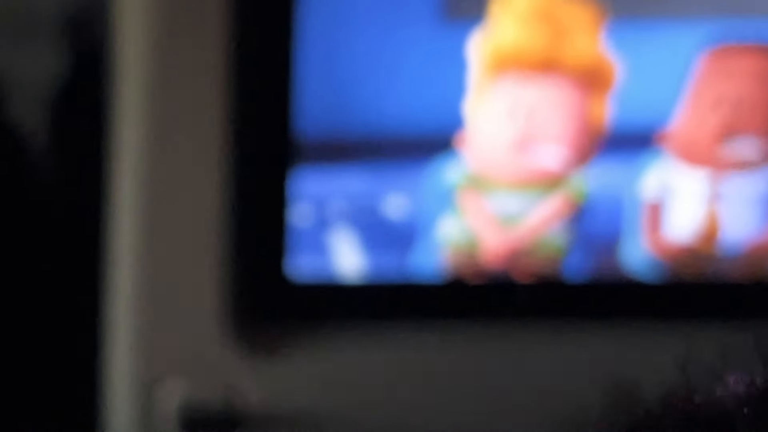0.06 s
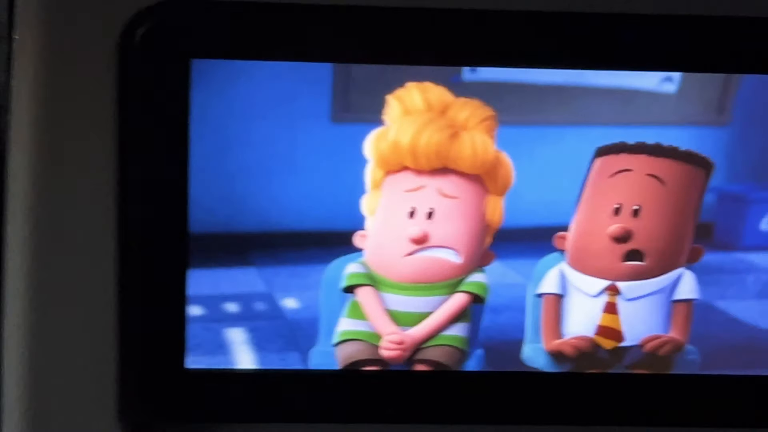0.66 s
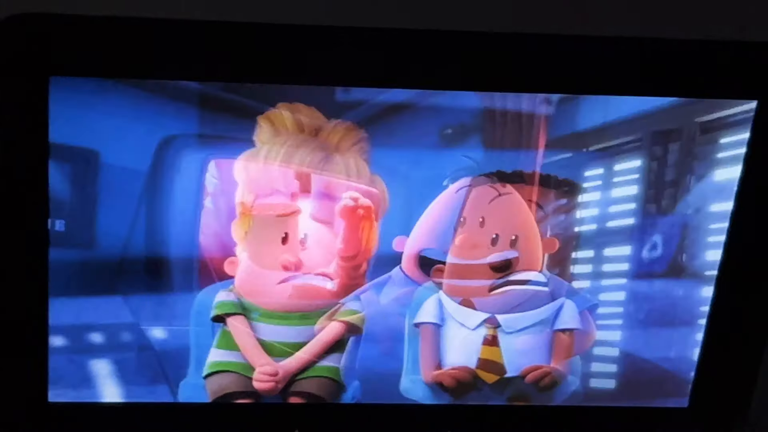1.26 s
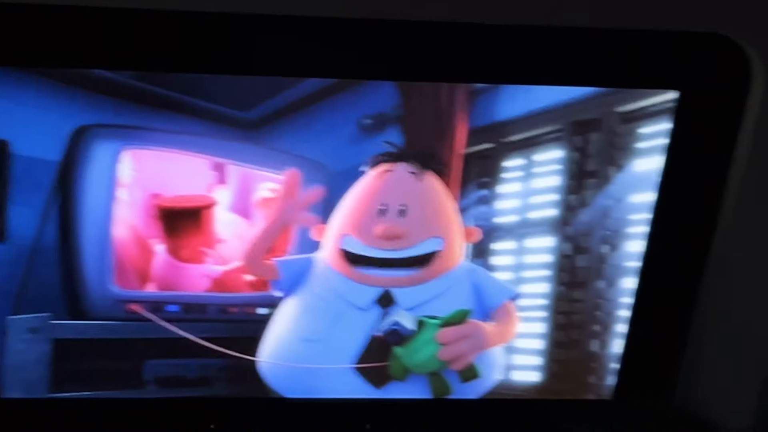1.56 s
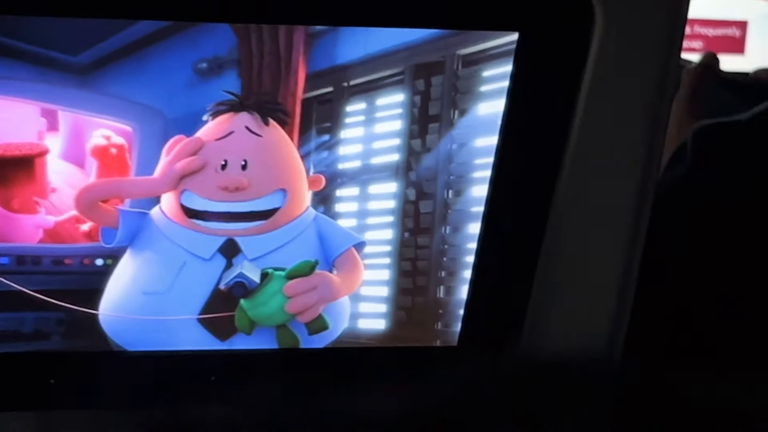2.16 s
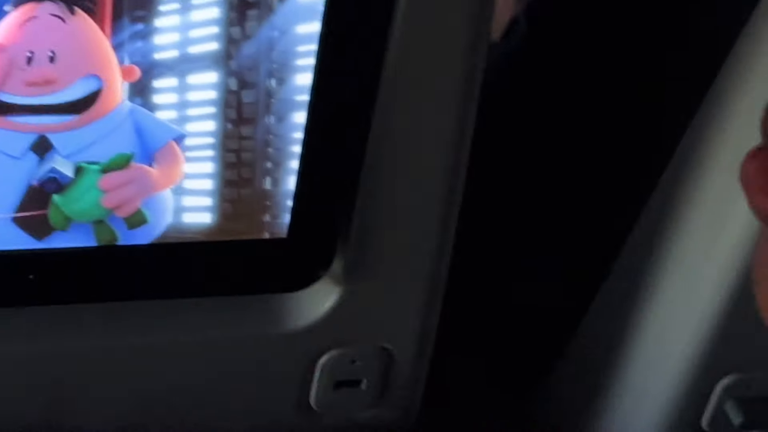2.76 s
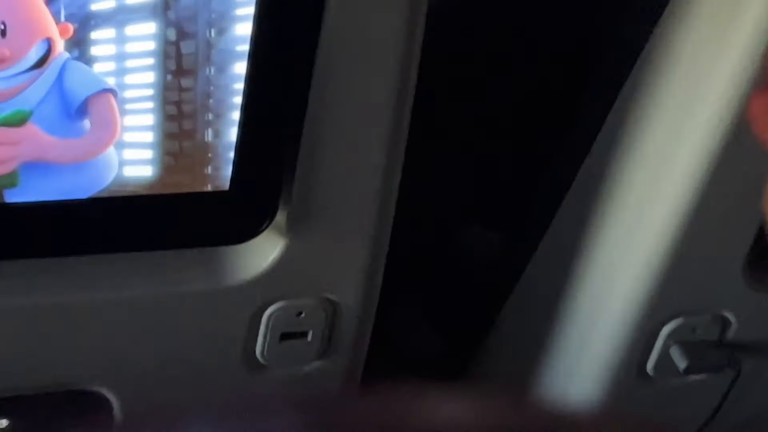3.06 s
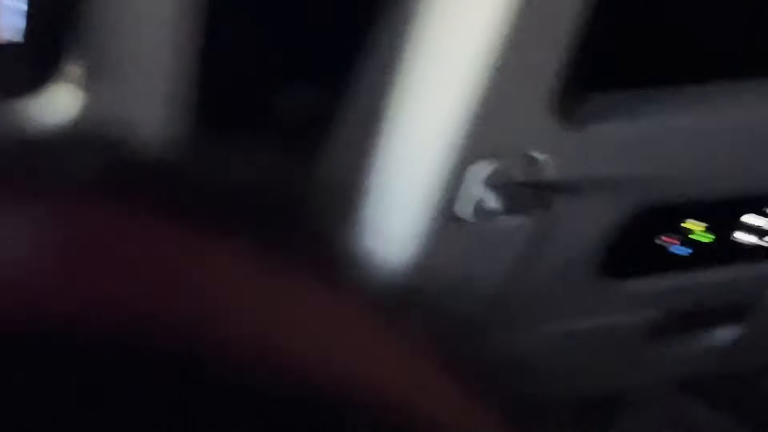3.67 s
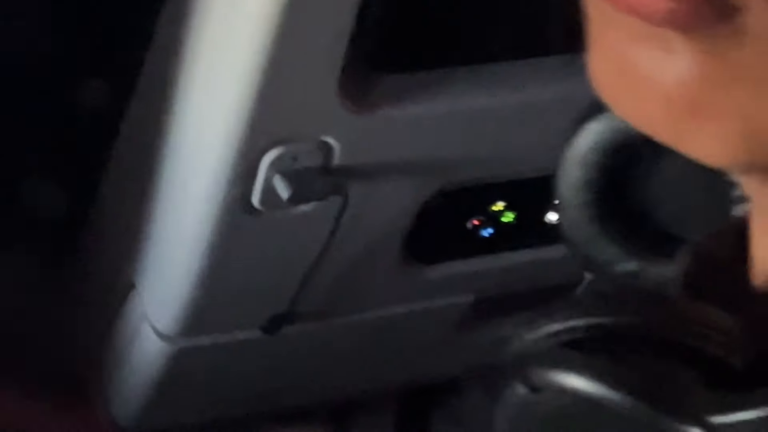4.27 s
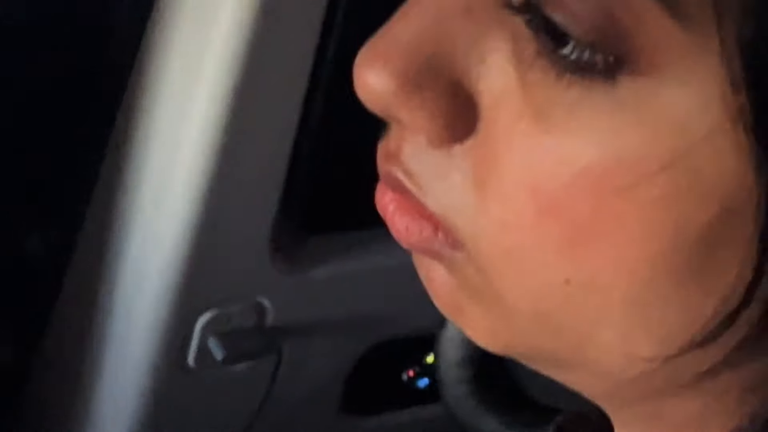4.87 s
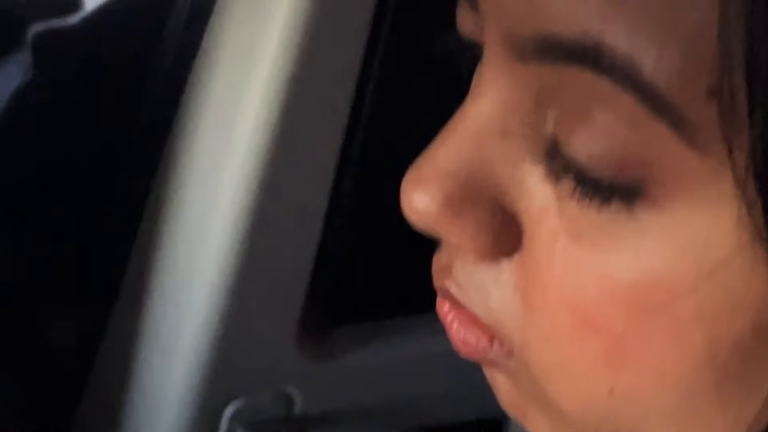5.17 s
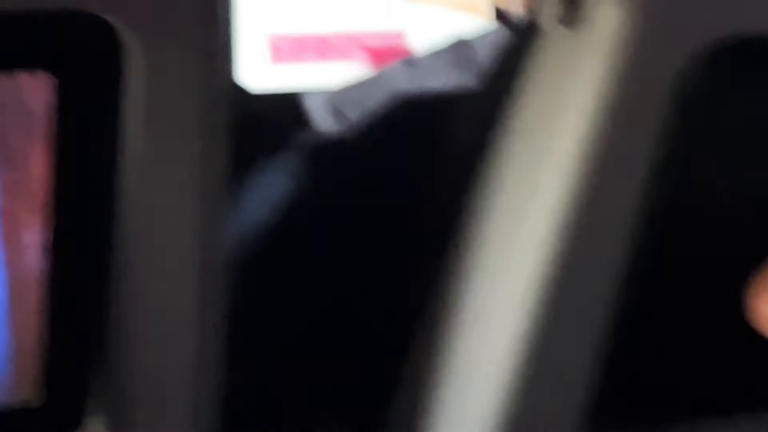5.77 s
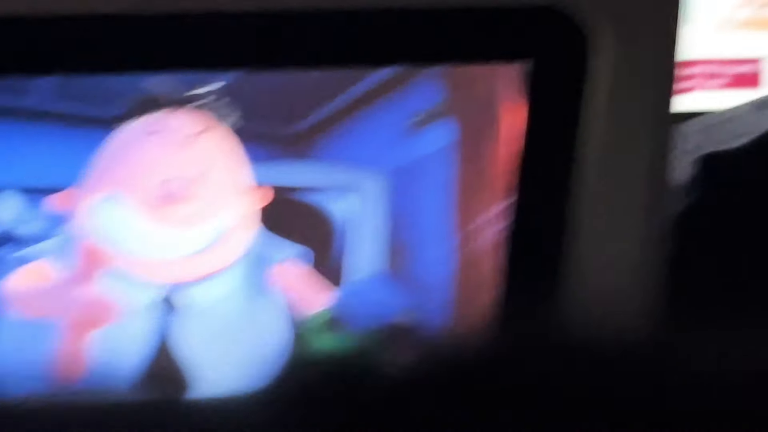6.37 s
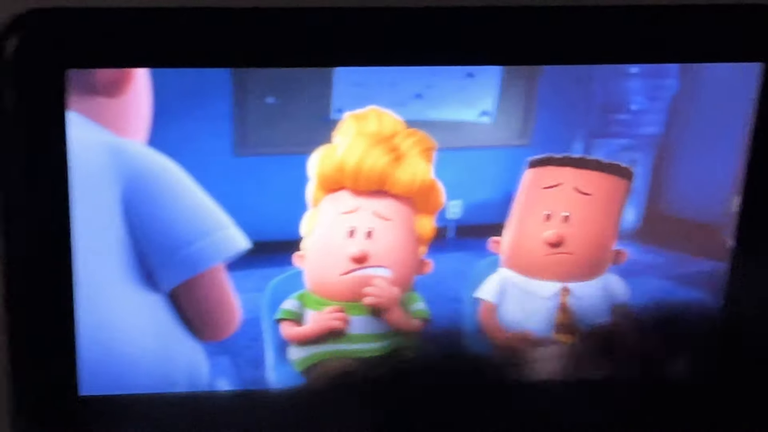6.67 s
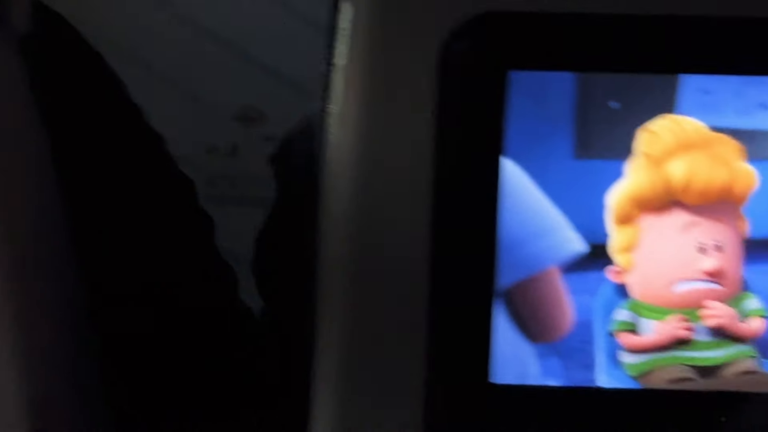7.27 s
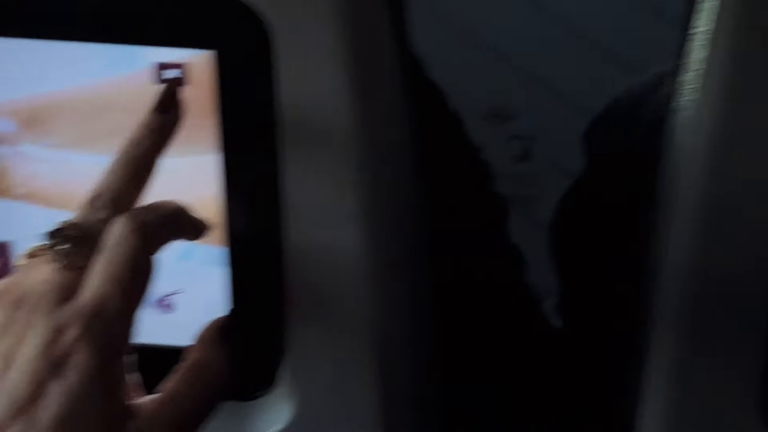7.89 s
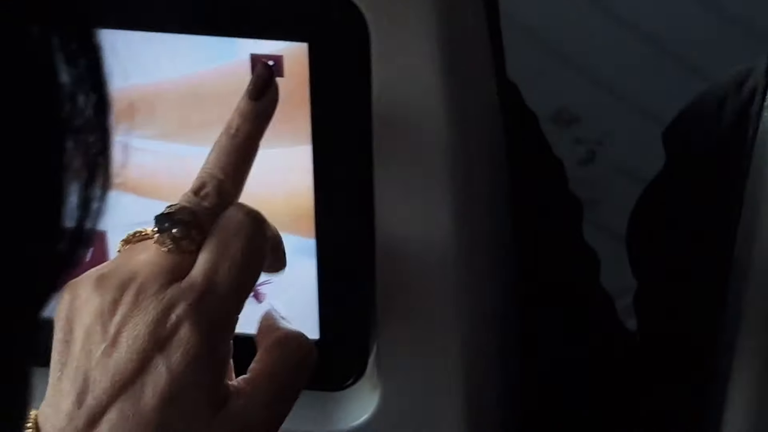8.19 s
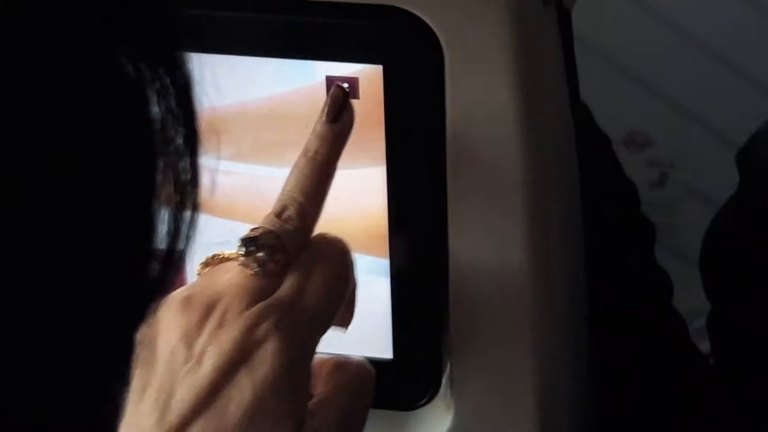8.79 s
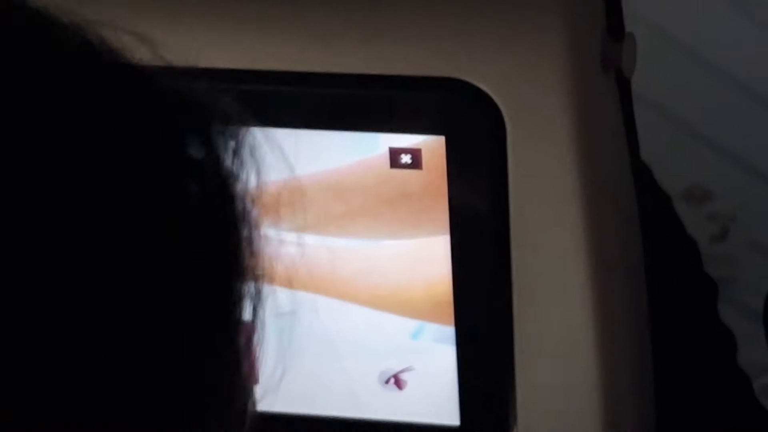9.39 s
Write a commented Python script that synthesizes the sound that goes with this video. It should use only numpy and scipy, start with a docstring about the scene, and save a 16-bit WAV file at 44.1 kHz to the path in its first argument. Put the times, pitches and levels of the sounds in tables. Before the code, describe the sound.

A deep, steady rumble of rushing air fills the cabin of a cruising airliner for the whole nine and a half seconds. Low engine tones hum within it, and one droning note gently swells and dips as a hand-held microphone moves along the seats. Much quieter, air vents hiss and two fans give a thin, high whine, which fades near 4.7 seconds, returns around 6 and fades again toward the end.

At about 4.7 seconds a plastic fitting gives one tiny, sharp tick. From 4.9 to 5.3 seconds cloth brushes the microphone in a quick cluster of light, high, crisp rustles, with another short brush around 6.2 seconds. From about 6 seconds the vent hiss turns a little brighter, most of all near 8.7. The rumble and hum continue unbroken, growing slightly louder and deeper toward the end.

```python
"""In the dark cabin of a cruising airliner, a hand-held microphone moves along a row of seats.
Air rushing over the hull makes the cabin rumble and drone, and the engines' turning shafts hum.
Air vents hiss and two fans whine; an echo off the seat backs changes the colour of the hiss.
About halfway through, a plastic fitting ticks once, then cloth brushes the microphone."""
import sys
import numpy as np
from scipy import signal
from scipy.fft import rfft, irfft
from scipy.io import wavfile
from scipy.ndimage import uniform_filter1d, minimum_filter1d

SR = 44100
rng = np.random.default_rng(int(sys.argv[2]) if len(sys.argv) > 2 else 0)


def unload_wav(signal):
    """Save mono or channel-first audio to the path in sys.argv[1] as 16-bit WAV at rate SR, clipped to [-1, 1]."""
    wavfile.write(
        sys.argv[1],
        SR,
        np.round(np.clip(np.atleast_2d(signal).T, -1, 1) * 32767).astype(np.int16),
    )


N = 416259
TIME = np.arange(N) / SR
FREQS = np.maximum(np.arange(N // 2 + 1) * SR / N, 1)

# how far along the row the microphone is: time_s, share (0-1)
ROW_POSITION = [(0, .15), (2, 0), (3.5, .2), (6.3, .45), (7.4, .9), (8.4, .85), (9.44, 1)]
# how alike the left and right sides sound: pitch_hz, likeness (0-1)
STEREO_LIKENESS = [(30, .998), (70, 0.98), (120, 0.95), (180, 0.88), (270, 0.65), (370, 0.86), (550, 0.55),
                   (900, 0.33), (1400, 0.33), (2000, 0.78), (2500, 1), (3000, 0.73), (4200, 1), (6000, 1)]
# colour of the airflow on the hull: pitch_hz, level_db_per_hz
AIRFLOW_COLOUR = [(20, -82), (30, -63), (45, -51.5), (58, -43), (100, -39), (140, -41.5), (190, -47),
                  (275, -54), (380, -54), (500, -60.5), (720, -67), (1200, -74.5), (1600, -81),
                  (3200, -100)]
# pitches at which the airflow makes the cabin boom: pitch_hz, width_hz, level_db
CABIN_BOOMS = [(60.8, 5.7, -31), (87.1, 6.9, -26.5), (110, 7, -31.5), (196.3, 4, -39.5), (216.6, 5, -40),
               (337, 15.5, -39), (628, 35, -50)]
# the strongest standing wave at the microphone: time_s, level_db
STANDING_LEVEL = [(0, -28), (1.4, -28), (2.35, -37), (2.6, -25), (4.1, -28), (5.2, -21), (5.75, -30),
                  (6.6, -21.5), (7.8, -29), (9.44, -28)]
# engine and pump tones: pitch_hz, level_db, left_right_phase_rad, waver_db, gain_along_row_db
ENGINE_TONES = [(33.4, -43.5, .05, 2, 3.5), (159.3, -35.5, 1.4, 1.5, 1), (319.7, -39.7, 1.6, 1.2, 7.5)]
# how squarely the microphone faces the air vent: time_s, share (0-1)
VENT_FACING = [(0, .3), (2.5, .05), (5.3, .1), (6, .55), (6.9, .45), (8.75, 1), (9.44, .85)]
# colour of the vent's hiss: pitch_hz, level_db_per_hz
HISS_COLOUR = [(600, -100), (1400, -89), (2100, -81.5), (2800, -87), (3600, -90), (4600, -91), (6300, -90),
               (7900, -88.5), (9000, -94.5), (11100, -90), (12500, -95), (14500, -96), (16000, -88)]
# ringing of the microphone's case, stirred by air or cloth: pitch_hz, width_hz, air_db, brush_db
CASE_RINGS = [(7505, 25, -75, -15), (7805, 30, -74, -12), (8204, 25, -72, -11), (10411, 20, -71, -10),
              (11541, 20, -77, -20), (13559, 40, -73, -8), (14784, 35, -75, -14)]
# the longer route of the hiss that bounces off the nearest seat back: time_s, extra_path_m
SEAT_ECHO_PATH = [(0, .29), (2.1, .175), (3.4, .135), (4, .094), (5, .135), (6.4, .127), (7.2, .2),
                  (8.1, .224), (9.44, .228)]
# the air jet's brightest bands: pitch_hz, width_hz, level_against_whistle_db
JET_BANDS = [(7900, 400, -16), (8900, 250, -22)]
# two fans of almost equal speed: pitch_hz, extra_db
FAN_TONES = [(2972, 2.5), (3036, 1)]
# the fans' shared loudness at the microphone: time_s, level_db
FAN_LOUDNESS = [(0, -67), (4, -68), (4.7, -79), (5.5, -73), (5.95, -61.5), (7.1, -68), (7.7, -66),
                (8.6, -74), (9.44, -80)]
# a small plastic tick: start_s, pitch_hz, decay_s, peak_db
PLASTIC_TICKS = [(4.7038, 3770, 0.00053, -35)]
# cloth brushing the case: start_s, fade_s, level_db, ring_against_brush_db
CLOTH_BRUSHES = [(4.858, .012, -42, -10), (4.927, .016, -38.5, 1), (4.947, .018, -37, 1),
                 (5.026, .013, -34, -6), (5.043, .014, -34, -6), (5.047, .065, -38, -4),
                 (5.245, .04, -47, -3), (6.145, .11, -47, 2), (6.211, .036, -38, -1)]
# colour of the rubbing cloth: pitch_hz, relative_level_db
CLOTH_COLOUR = [(3000, -33), (5800, -15), (7000, -5), (8000, -2), (9000, -5.5), (11200, -4), (12500, -5),
                (14200, 0), (15400, 4), (16000, -5)]

# each layer grows along the row: start_db, gain_db
DEEP_DB, RUMBLE_DB, RUSH_DB, HISS_DB = (-1.7, 4.8), (-1.1, 1.3), (-1.3, 2.4), (-1.1, 2.0)
# the vent's treble and whistle grow as the microphone faces it: facing_away_db, gain_db
TREBLE_DB, WHISTLE_DB = (-1.1, 4.8), (-69, 24)


def from_db(db):
    """Turn decibels into a number to multiply by."""
    return 10 ** (np.asarray(db) / 20)


def rms_one(x):
    """Scale a signal so that its average strength (rms) is 1."""
    return x / np.sqrt(np.mean(x ** 2) + 1e-20)


def over_time(table):
    """Join a table's points with lines to get a value at every sample."""
    time_s, value = np.transpose(table)
    return np.interp(TIME, time_s, value)


def over_pitch(table):
    """Join a table's points to get a value at every frequency."""
    pitch_hz, value = np.transpose(table)
    return np.interp(np.log(FREQS), np.log(pitch_hz), value)


def growing(share, range_db):
    """A gain that rises as the share goes from 0 to 1."""
    start_db, gain_db = range_db
    return from_db(start_db + gain_db * share)


def below(split_hz):
    """A soft split: near 1 below this pitch, near 0 above it."""
    return 1 / (1 + (FREQS / split_hz) ** 8)


def drift(rate_hz, step=200):
    """A smooth random wobble, about 1 in size; a higher rate wobbles faster."""
    memory = np.exp(-2 * np.pi * step * rate_hz / SR)
    noise = rng.standard_normal(N // step + 1002)
    slow = signal.lfilter([1], [1, -2 * memory, memory ** 2], noise)[1000:]  # let the filter settle
    return np.interp(np.arange(N) / step, np.arange(len(slow)), rms_one(slow))


def resonance(pitch_hz, width_hz, level_db):
    """Power per Hz of something that noise sets ringing: a narrow hump around one pitch."""
    hump = 1 / (1 + ((FREQS - pitch_hz) / width_hz) ** 2) ** 2
    return from_db(level_db) ** 2 * hump / (width_hz * np.pi / 2)


def stereo_noise(power):
    """Noise shaped by a power per Hz; left and right differ where sound comes from all around."""
    alike = np.clip(over_pitch(STEREO_LIKENESS), 0, 1)
    mid, side = rfft(rng.standard_normal((2, N))) * np.sqrt(power * SR / 2)
    side = side * np.sqrt((1 - alike) / (1 + alike))
    return irfft([mid + side, mid - side], N)


def stereo_tone(pitch_hz, apart_rad):
    """A tone of strength 1 that follows a changing pitch, with left and right out of step."""
    phase = 2 * np.pi * np.cumsum(pitch_hz) / SR
    return np.sqrt(2) * np.sin(phase + apart_rad * np.array([[.5], [-.5]]))


def hull(position, deep_hz=85, rush_hz=230):
    """Swirling air shakes the hull: a deep boom, a rumble ringing in the cabin and a rush above."""
    power = from_db(over_pitch(AIRFLOW_COLOUR)) ** 2 + sum(resonance(*boom) for boom in CABIN_BOOMS)
    deep = below(deep_hz)
    rush = 1 - below(rush_hz)
    rumble = (1 - deep) * (1 - rush)
    bands = [(deep, DEEP_DB), (rumble, RUMBLE_DB), (rush, RUSH_DB)]
    return sum(stereo_noise(power * band) * growing(position, range_db) for band, range_db in bands)


def standing_wave(pitch_hz=134.3, width_hz=5.8):
    """The cabin drones on one low note; the microphone passes through its loud and quiet spots."""
    return stereo_noise(resonance(pitch_hz, width_hz, 0)) * from_db(over_time(STANDING_LEVEL))


def engines(position, wander_hz=.25):
    """Turning shafts hum, wavering a little and growing louder along the row."""
    hum = 0
    for pitch_hz, level_db, apart_rad, waver_db, gain_db in ENGINE_TONES:
        tone = stereo_tone(pitch_hz + wander_hz * drift(1), apart_rad)
        hum = hum + tone * from_db(level_db + gain_db * position + waver_db * drift(3))
    return hum


def seat_echo(hiss, strength=.12, sound_m_per_s=343):
    """A seat back returns a faint, late copy; added to the hiss, it lifts some pitches and dips others."""
    delay_s = over_time(SEAT_ECHO_PATH) / sound_m_per_s
    return strength * np.array([np.interp(TIME - delay_s, TIME, side) for side in hiss])


def air_vent(position, treble_hz=9000):
    """Air jets hiss over a duct's tone; facing the vent brings more treble and a thin whistle."""
    facing = over_time(VENT_FACING)
    duct = resonance(pitch_hz=2139, width_hz=16, level_db=-66)
    case = sum(resonance(hz, width_hz, air_db) for hz, width_hz, air_db, _ in CASE_RINGS)
    power = from_db(over_pitch(HISS_COLOUR)) ** 2 + duct + case
    low = below(treble_hz)
    body = stereo_noise(power * low) * growing(position, HISS_DB)
    treble = stereo_noise(power * (1 - low)) * growing(facing, TREBLE_DB)
    hiss = body + treble
    whistle = resonance(pitch_hz=15640, width_hz=170, level_db=0)
    jet = whistle + sum(resonance(*band) for band in JET_BANDS)
    return hiss + seat_echo(hiss) + stereo_noise(jet) * growing(facing, WHISTLE_DB)


def fans(wander_hz=2.25, waver_db=2.0, apart_rad=.75):
    """Spinning blades whine on two close pitches, wavering in the cabin's standing waves."""
    level_db = over_time(FAN_LOUDNESS)
    whine = 0
    for pitch_hz, extra_db in FAN_TONES:
        tone = stereo_tone(pitch_hz + wander_hz * drift(3.7), apart_rad)
        whine = whine + tone * from_db(level_db + extra_db + waver_db * drift(9.1))
    return whine


def tick():
    """A soft touch makes a plastic fitting ring at one pitch, which dies away at once."""
    sound = 0
    for start_s, pitch_hz, decay_s, peak_db in PLASTIC_TICKS:
        age_s = np.clip(TIME - start_s, 0, 20 * decay_s)
        pulse = age_s / decay_s * np.exp(1 - age_s / decay_s)
        sound = sound + from_db(peak_db) * pulse * np.sin(2 * np.pi * pitch_hz * age_s)
    return sound


def cloth(grain_db=.5, rise_share=.5):
    """Each brush swells and fades: fibres catch and rub, and the microphone's case rings along."""
    rub_power, ring_power = 0, 0
    for start_s, fade_s, level_db, ring_db in CLOTH_BRUSHES:
        rise_s = rise_share * fade_s
        swell = np.clip((TIME - start_s) / rise_s, 0, 1)
        fade = np.exp(-np.clip((TIME - start_s - rise_s) / fade_s, 0, 20))
        rub_power = rub_power + (from_db(level_db) * swell * fade) ** 2
        ring_power = ring_power + (from_db(level_db + ring_db) * swell * fade) ** 2
    smooth_rub = stereo_noise(from_db(over_pitch(CLOTH_COLOUR)) ** 2)
    grainy_rub = rms_one(smooth_rub * from_db(grain_db * drift(120)))
    case = sum(resonance(hz, width_hz, brush_db) for hz, width_hz, _, brush_db in CASE_RINGS)
    return np.sqrt(rub_power) * grainy_rub + np.sqrt(ring_power) * stereo_noise(case)


def limiter(sound, ceiling=.53, window_s=.04):
    """Ease the volume down around the strongest swells of the rumble."""
    window = int(window_s * SR)
    peak = np.abs(sound).max(axis=0)
    gain = (1 + (peak / ceiling) ** 14) ** (-1 / 14)
    return sound * uniform_filter1d(minimum_filter1d(gain, window), window)


def scene(lean_left_db=.3):
    """Add up all the sounds; the rumble, drone and hum lean slightly to the left."""
    position = over_time(ROW_POSITION)
    drone = hull(position) + standing_wave() + engines(position)
    lean = from_db([[lean_left_db], [-lean_left_db]])
    return drone * lean + air_vent(position) + fans() + tick() + cloth()


def record(dry, widen_above_hz=8400, cutoff_hz=15760):
    """Hold back swells, widen the high hiss by letting the right side lag, and cut the very top."""
    lag_rad = 2 * np.pi * np.maximum(FREQS - widen_above_hz, 0) / 3600  # a full turn every 3600 Hz
    widen = np.exp(1j * lag_rad * np.array([[.5], [-.5]]))
    top_cut = 1 / np.sqrt(1 + (FREQS / cutoff_hz) ** 800)
    return irfft(rfft(limiter(dry)) * top_cut * widen, N)


dry = scene()
out = record(dry)
unload_wav(out)
```